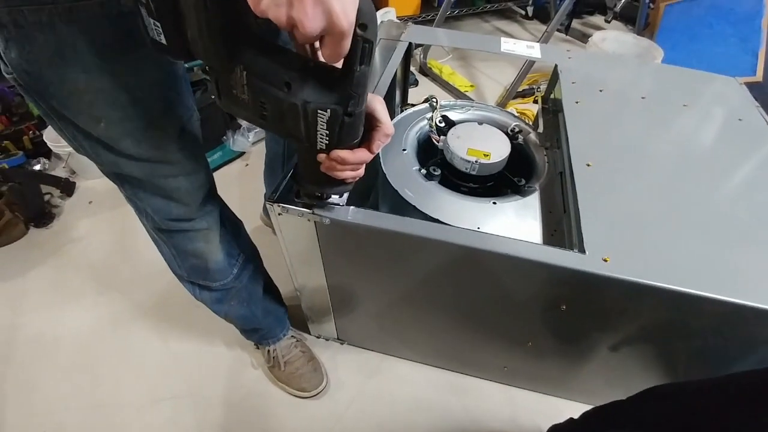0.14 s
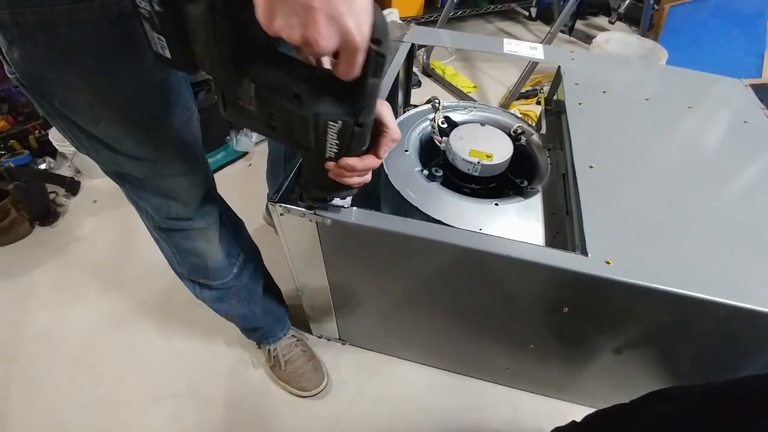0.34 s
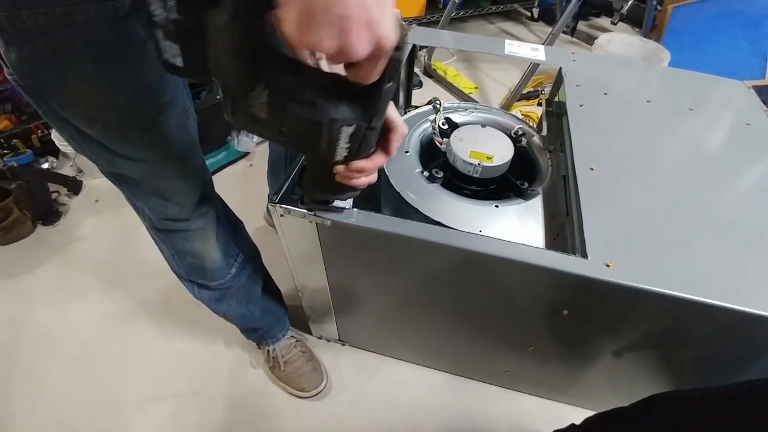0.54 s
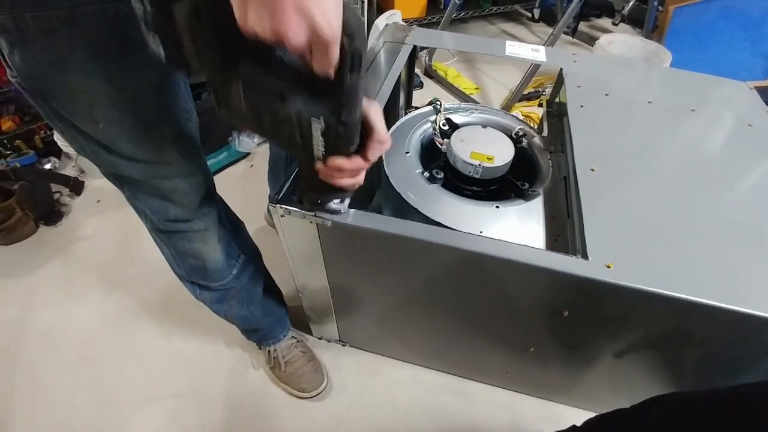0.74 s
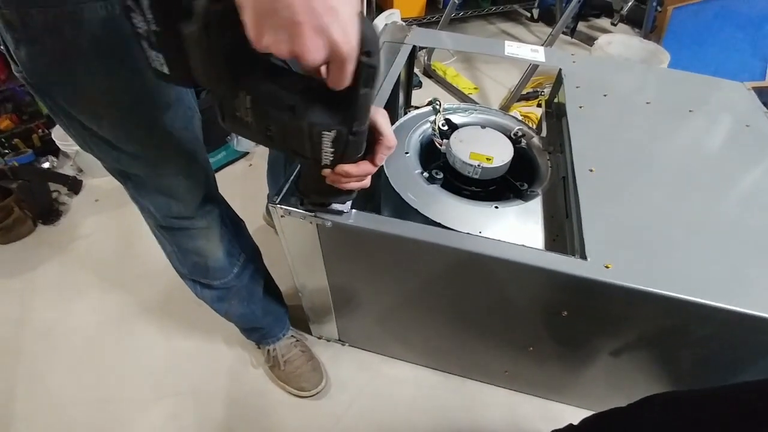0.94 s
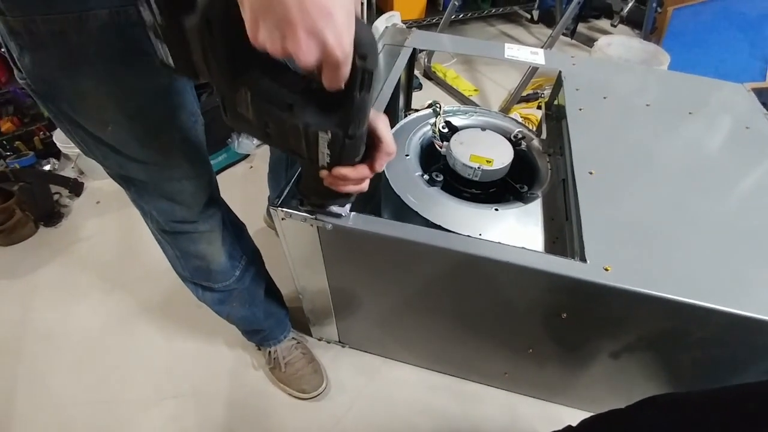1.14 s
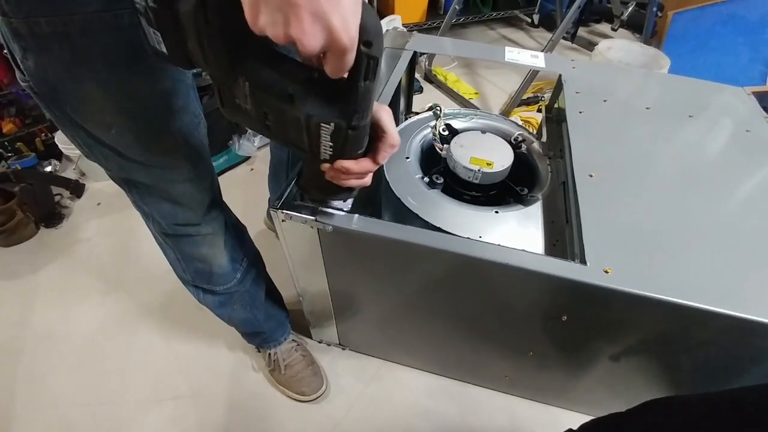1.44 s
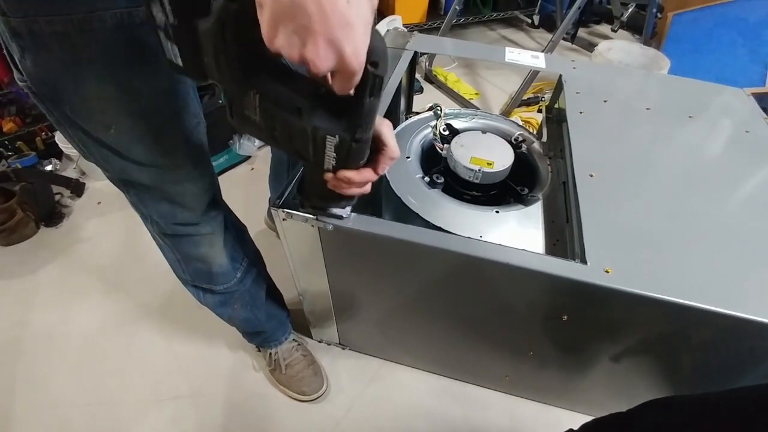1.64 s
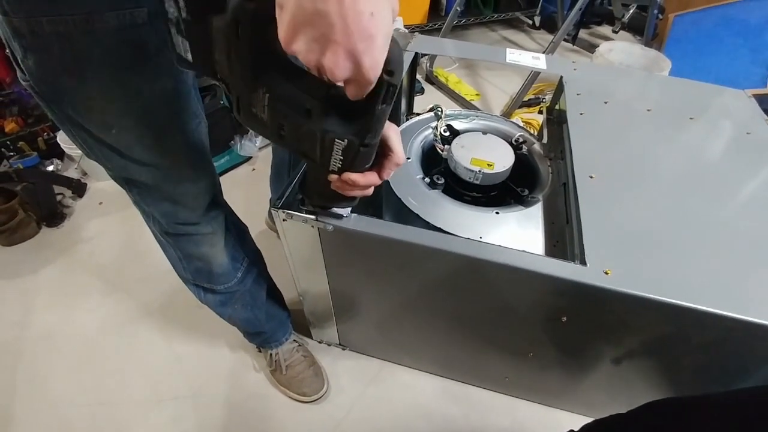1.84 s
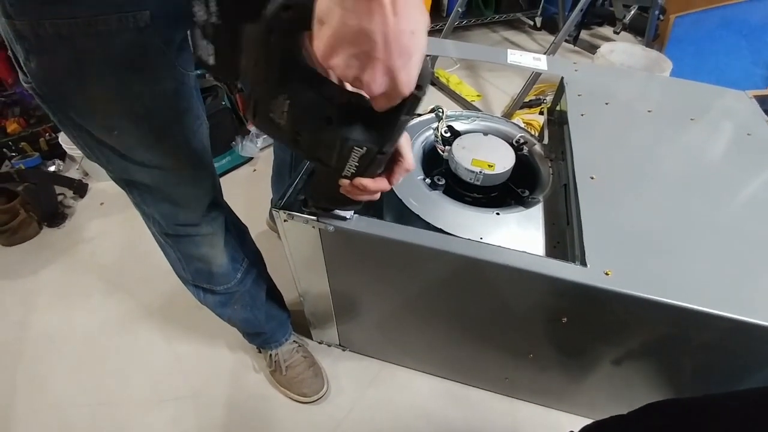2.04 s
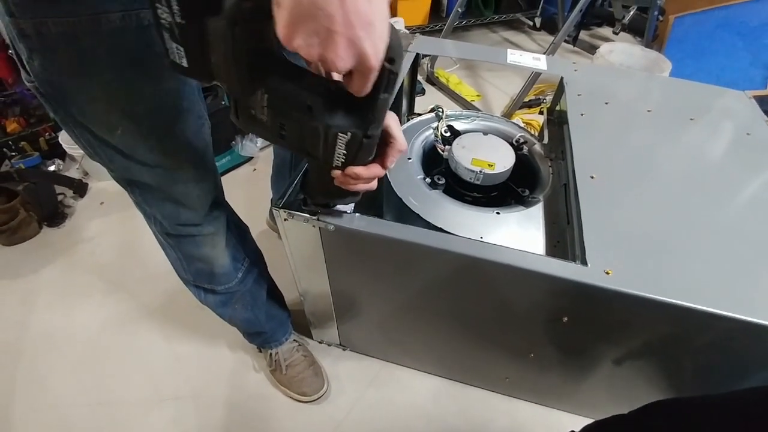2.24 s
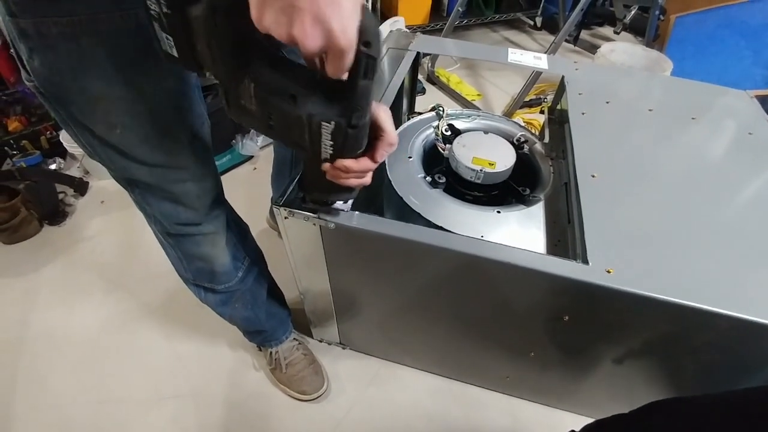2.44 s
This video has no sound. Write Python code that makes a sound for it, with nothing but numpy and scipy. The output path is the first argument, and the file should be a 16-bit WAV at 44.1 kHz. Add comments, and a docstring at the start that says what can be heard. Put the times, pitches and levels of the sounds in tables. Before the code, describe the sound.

A reciprocating saw cuts a hollow sheet-metal cabinet, close and loud in an indoor workshop. A clattering jab opens, snagging near 0.1 s, with knocks and a sharp snag around 0.4-0.5 s over decaying ring. From 0.87 s it bites again, eases near 1.25 s, then rasps and howls densely from 1.3 to 2.15 s. Low booms, faint thin squeals and knocks; the ring fades by 2.6 s.

```python
"""A reciprocating saw rasps and clangs through a sheet-metal cabinet in a workshop, close by.
The blade jabs and snags a few times, then cuts for over a second and dies away.
Teeth are dense coloured clicks; strokes, snags and knocks drive a modal ring of the cabinet.
The cut edge howls, slow booms and thin squeals join, and a tail answers rasp and howl.
The recorder's fast limiter holds the peaks."""
import sys
import numpy as np
from scipy import signal
from scipy.fft import rfft, irfft
from scipy.io import wavfile
from scipy.ndimage import uniform_filter1d, minimum_filter1d

SR = 44100
rng = np.random.default_rng(int(sys.argv[2]) if len(sys.argv) > 2 else 0)


def transcribe(signal):
    """Save signal, clipped to [-1, 1], as a 16-bit WAV file at the path in sys.argv[1]."""
    frames = np.atleast_2d(signal).T
    limited = np.clip(frames, -1, 1)
    pcm = np.round(limited * 32767).astype(np.int16)
    wavfile.write(sys.argv[1], SR, pcm)


N = 114660

# blade snags on the edge: (time [s], relative scrape level [dB], relative blow to the edge [dB],
# relative blow to the panels [dB], scrape decay constant [s])
BLADE_SNAGS = [(.0712, -11.5, -2, -7, 0.0074), (0.3949, -13.5, 0.5, -13, 0.013),
               (.4599, -16, -4.5, -49, 0.0059), (0.4861, -1, 2, -10.5, 0.004),
               (0.7429, -36, -11.5, -13, 0.028), (.855, -44, -14, -44, 0.007),
               (0.8742, -14, -21, -43, 0.011), (.9118, -16.5, -11.5, -12, 0.0057),
               (2.0931, -6.5, -26, -36, 0.004), (2.531, -37.5, -25.5, -54, 0.0067),
               (2.585, -53, -15, -36, 0.017)]
# strong cabinet modes, lowest first: (frequency [Hz], relative energy [dB], t60 [s])
CABINET_MODES = [(133.44, -17.5, 1.18), (183.3, -19, 0.96), (228.1, -13, 0.73), (364.6, -12, 0.53),
                 (414.7, -13, 0.63), (525.2, -1, 0.66), (566.9, -5, .2), (651, -20.5, 0.05),
                 (724.2, -3.5, 0.51), (809.7, -8, 0.66), (954, -10.5, 0.067), (1278, -10.5, 0.43),
                 (1378, -21.5, 0.092), (1803, -17.5, 0.31)]
STROKES_PER_S = 44  # mean rate
RIGHT_LEAD_S = 0.00008  # right channel ahead of left


def teeth(place, strength):
    """Teeth tear the edge in dense random clicks, paced by the strokes; snags add short scrapes."""
    teeth_per_s, tooth_spread_db = 5900, 0.5
    flicker_db, flicker_hz = 1.8, 110
    stroke_depth, scrape_rise_s = 0.36, 0.0006
    rasp_db, room_db = 2, -1.5

    hits = rng.random(N) < teeth_per_s / SR
    clicks = rng.standard_normal((2, N)) * hits * amp(tooth_spread_db * rng.standard_normal(N))
    pull = strength * (1 + stroke_depth * np.sin(2 * np.pi * place))
    flicker = amp(flicker_db * drift(N, flicker_hz))
    level = effort(axis=1) * unit(pull * flicker)

    t = np.arange(SR // 4) / SR
    for s, scrape_db, _, _, decay_s in BLADE_SNAGS:
        rise = np.minimum(t / scrape_rise_s, 1)
        add(level, s, amp(scrape_db) * rise * np.exp(-t / decay_s))
    direct = through(unit(clicks) * level, rasp_colour())
    return amp(rasp_db) * (direct + amp(room_db) * room(direct))


def rasp_colour():
    """Stereo filter for the spectrum of the rasp at the two microphones."""
    # rasp spectrum: (frequency [Hz], relative left level [dB], relative right level [dB])
    rasp_spectrum = [(200, -20, -20), (700, 2, 2), (1300, 2, 3), (2000, 0, 0), (2800, -4, -4), (3800, 0, 3),
                     (6500, 0, 3), (7800, -1, 5.5), (8400, -2, 2), (9050, -10, -10), (9600, 1, -4),
                     (10400, 5, -1), (12200, 3, 3), (13700, 2, 4), (14800, -1, -5), (15900, -2, -8)]
    return unit_energy(np.array([colour(rasp_spectrum, axis=1), colour(rasp_spectrum, axis=2)]))


def strokes():
    """Place within the wandering stroke cycle (0-1) and a random strength for each half-cycle."""
    wander, wander_hz, spread_db = 0.22, 8, 1.8
    rate = STROKES_PER_S * np.maximum(1 + wander * drift(N, wander_hz), 0)
    turns = np.cumsum(rate) / SR
    half_cycle = (2 * turns).astype(int)
    return turns % 1, amp(spread_db * rng.standard_normal(N))[half_cycle]


def effort(axis):
    """Gain over time of one column of the two cuts, smoothed at the ends of each."""
    # the jabs, then the long cut: (time [s], rasp of the teeth [relative dB],
    # shaking of the cut edge [relative dB], flapping of the wide panels [relative dB])
    first_cut = [(0, -25.5, -3.5, -6.5), (.055, -35.5, -26, -16.5), (0.086, -10.5, 2, -15),
                 (0.119, -45, -14.5, -8.5), (0.168, -33, -19, -22.5), (.24, -39, -37, -27),
                 (.34, -56.5, -59, -32), (0.389, -44, -5.5, -55)]
    long_cut = [(0.856, -62, -38, -45), (0.878, -12.5, -9, -16.5), (.93, -24, -4, -18),
                (1.001, -9, -5, -11), (1.06, -16, -4.5, -12), (1.12, -22.5, -11, -13.5),
                (1.21, -31.5, -10, -10.5), (1.292, -38.5, -12, -35), (1.317, -15.5, -3, -21.5),
                (1.461, -11.5, -6, -22), (1.6, -9, -2.5, -19.5), (1.762, -11, -3.5, -15),
                (1.914, -12.5, -6, -18), (1.98, -19.5, -5, -16), (2.075, -23.5, -2, -13.5),
                (2.12, -13, -6, -21), (2.182, -44, -7.5, -17), (2.211, -39, -30, -16.5),
                (2.29, -38.5, -19, -22), (2.422, -49.5, -25, -25), (2.572, -54, -51, -33),
                (2.6, -44, -20, -33)]
    t = np.arange(N) / SR
    first, second = np.array(first_cut), np.array(long_cut)
    gain = np.zeros(N)
    for cut, active in ((first, t < first[-1, 0]), (second, t > second[0, 0])):
        gain += amp(np.interp(t, cut[:, 0], cut[:, axis])) * active
    return uniform_filter1d(gain, size=256)


def cabinet(place, strength):
    """Strokes push the metal softly, snags and knocks strike it: the edge clangs, the panels rumble."""
    # the saw's shoe knocks on the sheet:
    # (time [s], relative blow to the edge [dB], relative blow to the panels [dB])
    shoe_knocks = [(.211, -14, -26), (0.278, -24.5, -12.5), (2.072, -3, -12.5), (2.197, -30, -10),
                   (2.27, -11.5, -15)]
    split_hz, edge_db, panel_db = 537, -5.5, 2.5
    jolt_decay_s, steady_push, stroke_lowpass_hz = 0.0055, 0.31, 970
    ring_rise_s, blow_energy_s = 0.002, 0.003

    ring = cabinet_ring() * (1 - np.exp(-np.arange(SR) / SR / ring_rise_s))
    jolts = strength * (np.exp(-place / STROKES_PER_S / jolt_decay_s) + steady_push)
    blows = [(s, edge, panels) for s, _, edge, panels, _ in BLADE_SNAGS] + shoe_knocks
    out = 0
    for axis, side, db in ((2, "high", edge_db), (3, "low", panel_db)):
        force = amp(db) * unit(jolts * rng.standard_normal(N)) * effort(axis)
        force = signal.lfilter(*signal.butter(2, stroke_lowpass_hz, fs=SR), force)
        for blow in blows:
            # one-sample impulse with the energy of blow_energy_s of force at that rms
            add(force, blow[0], amp([blow[axis - 1]]) * np.sqrt(blow_energy_s * SR))
        band = signal.butter(4, split_hz, side, fs=SR, output="sos")
        out = out + through(force, unit_energy(signal.sosfilt(band, ring)))
    return out


def cabinet_ring():
    """The cabinet's answer to one blow: decaying strong modes over noise for its many weak ones."""
    # spectrum of the weak modes: (frequency [Hz], relative density [dB per Hz])
    weak_spectrum = [(30, -53), (55, -16), (85, -6.5), (150, -10), (300, -2), (450, -1), (560, 4),
                     (800, 0.5), (1000, -0.5), (1150, -11), (1400, -10.5), (2000, -23.5), (3000, -31.5),
                     (8000, -107)]
    # decay of the weak modes: (frequency [Hz], t60 [s])
    weak_t60 = [(120, 0.68), (350, 0.61), (600, 0.6), (2000, 0.34)]
    weak_db, likeness, mode_skew_rad = 3.5, 0.89, 0.29

    t = np.arange(SR) / SR
    left, other = tail(weak_t60)
    right = likeness * left + np.sqrt(1 - likeness ** 2) * other
    weak = through([left, right], colour(weak_spectrum)[None])[:, :SR]
    ring = amp(weak_db) * unit_energy(weak)
    for hz, db, t60 in CABINET_MODES:
        right_phase = 2 * np.pi * hz * RIGHT_LEAD_S + mode_skew_rad * rng.choice([-1, 1])
        phase = rng.uniform(0, 2 * np.pi) + np.array([[0], [right_phase]])
        decay = np.exp(-np.log(1000) * t / t60)
        ring = ring + amp(db) * unit_energy(np.sin(2 * np.pi * hz * t + phase) * decay)
    return ring


def chatter():
    """While the saw cuts, the blade keeps the cut edge vibrating in a rough, unsteady howl."""
    # centre pitch of the howl: (time [s], frequency [Hz])
    chatter_pitch = [(0, 510), (0.039, 445), (0.084, 570), (.13, 565), (.18, 500), (0.898, 563.6),
                     (.96, 533.2), (1.019, 569), (1.098, 530), (1.271, 520), (1.338, 580), (1.43, 525.7),
                     (1.498, 556.6), (1.578, 510.2), (1.642, 576), (1.7, 528), (1.771, 523.5),
                     (1.828, 566.7), (1.898, 520), (1.948, 568.6), (1.989, 535), (2.07, 553.9),
                     (2.2, 519.6), (2.6, 570)]
    howl_db, flutter_db, flutter_hz = -6.5, 1.5, 93
    pitch_wander, pitch_wander_hz, room_db = 0.07, 150.4, -17.5

    hz = np.interp(np.arange(N) / SR, *np.transpose(chatter_pitch))
    hz = hz * (1 + pitch_wander * drift(N, pitch_wander_hz))
    flutter = unit(amp(flutter_db * drift(N, flutter_hz)))
    level = amp(howl_db) * effort(axis=2) * flutter
    turns = np.cumsum(hz) / SR + hz * np.array([[0], [RIGHT_LEAD_S]])
    howl = np.sqrt(2) * level * np.sin(2 * np.pi * turns)
    return howl + amp(room_db) * room(howl)


def boom():
    """The cabinet's lowest modes swell with each flex and die slowly."""
    # the whole cabinet flexes: (time [s], level of the lowest mode [dB])
    cabinet_flexes = [(0, -28.5), (.18, -30), (1.085, -24.5), (2.339, -33)]
    lowest_hz, lowest_t60_s, rise_s, upper_modes_db = 66.7, 2.03, 0.014, -2

    modes = [(lowest_hz, 0, lowest_t60_s)]
    modes += [(hz, db + upper_modes_db, t60) for hz, db, t60 in CABINET_MODES[:3]]
    t, out = np.arange(N) / SR, 0
    for hz, mode_db, t60 in modes:
        swell = np.minimum(t / rise_s, 1) * np.exp(-np.log(1000) * t / t60)
        level = np.zeros(N)
        for s, db in cabinet_flexes:
            add(level, s, amp(db + mode_db) * swell)
        out = out + level * np.sin(2 * np.pi * (hz * t + rng.random()))
    return out


def squeals():
    """The blade squeals in the slot: short wavering whistles with their octave swell and fade."""
    # (time [s], length [s], relative level [dB], mean start pitch [Hz], mean end pitch [Hz])
    squeal_events = [(.05, .09, -32, 7950, 8030), (.84, .05, -36, 7950, 7950), (1.27, .06, -27, 8000, 7700),
                     (2.575, .05, -34, 7950, 7950)]
    waver, waver_hz, squeal_db, octave_db = 0.0074, 400, 1.5, -20

    out = np.zeros(N)
    for s, length_s, db, start_hz, end_hz in squeal_events:
        count = int(length_s * SR)
        hz = np.linspace(start_hz, end_hz, count) * (1 + waver * drift(N, waver_hz)[:count])
        angle = 2 * np.pi * np.cumsum(hz) / SR
        whistle = np.sin(angle) + amp(octave_db) * np.sin(2 * angle)
        add(out, s, amp(db + squeal_db) * np.hanning(count) * whistle)
    return out * amp([[-2], [2]])  # left, right dB


def room(x):
    """The workshop's tail: three diffuse responses blend in rotation, which keeps its colour even."""
    # decay of the workshop: (frequency [Hz], t60 [s])
    workshop_t60 = [(300, 0.67), (2000, .42), (6000, 0.3), (15000, 0.12)]
    turn_s = 0.3
    turn = 2 * np.pi * np.arange(N) / SR / turn_s
    out = 0
    for k in range(3):
        share = np.cos(turn + 2 * np.pi * k / 3) * np.sqrt(2 / 3)
        out = out + through(x * share, unit_energy(tail(workshop_t60)))
    return out


def workshop_floor():
    """Faint steady noise of the workshop, with the rasp's spectrum."""
    floor_db = -64
    return amp(floor_db) * through(rng.standard_normal((2, N)), rasp_colour())


def amp(db):
    """Decibels to gain."""
    return 10 ** (np.asarray(db) / 20)


def unit(x):
    """Scales to rms 1."""
    return x / np.sqrt(np.mean(x ** 2) + 1e-20)


def unit_energy(x):
    """Scales a stereo response to a mean energy of 1 per channel."""
    return x / np.sqrt(np.sum(x ** 2) / 2 + 1e-20)


def read(points, hz, axis=1):
    """Interpolates one table column on a log-frequency axis."""
    table = np.array(points, float)
    return np.interp(np.log(hz + 1), np.log(table[:, 0]), table[:, axis])


def add(mix, s, sound):
    """Adds a sound into mix at s seconds."""
    part = mix[round(s * SR):][:len(sound)]
    part += sound[:len(part)]


def drift(count, width_hz):
    """Noise of rms 1 under a Gaussian low-pass."""
    hz = np.fft.rfftfreq(count, 1 / SR)
    spectrum = rfft(rng.standard_normal(count)) * np.exp(-(hz / width_hz) ** 2)
    return unit(irfft(spectrum, count))


def colour(points, axis=1, size=2048):
    """Minimum-phase filter with the spectrum of a table."""
    hz = abs(np.fft.fftfreq(size, 1 / SR))
    log_gain = np.log(amp(read(points, hz, axis)))
    return np.fft.ifft(np.exp(np.conj(signal.hilbert(log_gain)))).real


def through(x, response):
    """Convolves with a response, cut to the scene's length."""
    return signal.fftconvolve(np.atleast_2d(x), response, axes=1)[:, :N]


def tail(t60s):
    """One second of stereo noise in which each band dies at its own speed."""
    hz, t, z = signal.stft(rng.standard_normal((2, SR)), SR, nperseg=256)
    decay = amp(-60 * t / read(t60s, hz)[:, None])
    return signal.istft(z * decay, SR, nperseg=256)[1][:, :SR]


def scene():
    """Sums the saw, the cabinet and the faint noise of the workshop."""
    place, strength = strokes()
    saw = teeth(place, strength) + squeals()
    metal = cabinet(place, strength) + chatter() + boom()
    return saw + metal + workshop_floor()


def record(dry):
    """Fast look-ahead peak limiter with linear dB recovery, light clipping, then a low-pass."""
    ceiling, look_s, recover_db_per_s = 1.74, 0.00033, 330
    clip_level, cutoff_hz = 0.97, 15750

    size = int(look_s * SR)
    over_db = np.maximum(20 * np.log10(abs(dry).max(0) / ceiling + 1e-9), 0)
    recovery_db = np.arange(N) * recover_db_per_s / SR
    gain_db = recovery_db - np.maximum.accumulate(over_db + recovery_db)
    gain_db = uniform_filter1d(minimum_filter1d(gain_db, size), size)
    limited = np.clip(dry * amp(gain_db), -clip_level, clip_level)
    lowpass = signal.firwin(511, cutoff_hz, window=("kaiser", 8), fs=SR)
    return signal.oaconvolve(limited, lowpass[None], "same")


dry = scene()
out = record(dry)
transcribe(out)
```